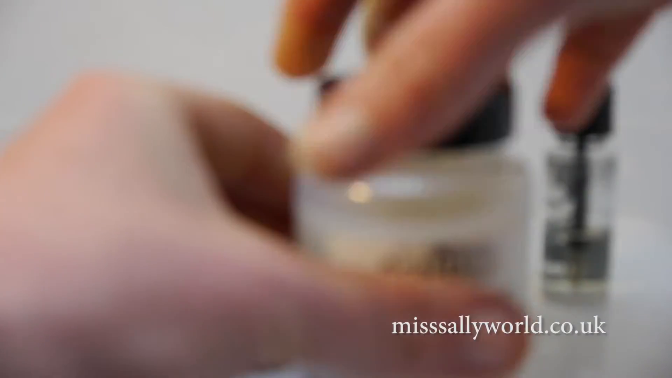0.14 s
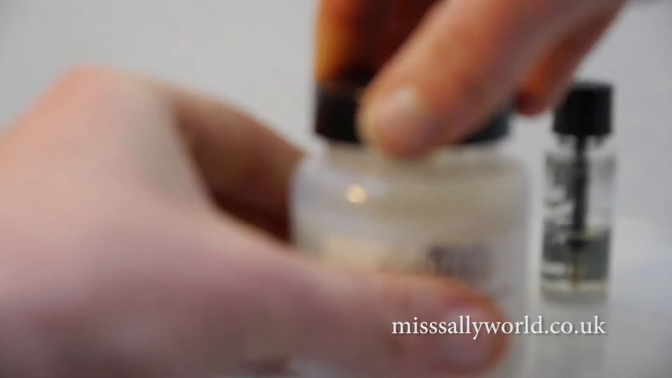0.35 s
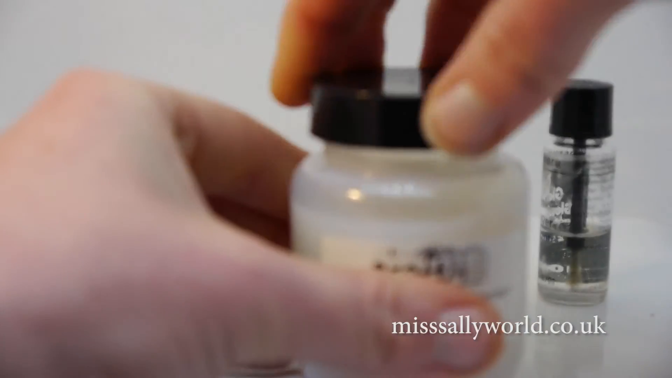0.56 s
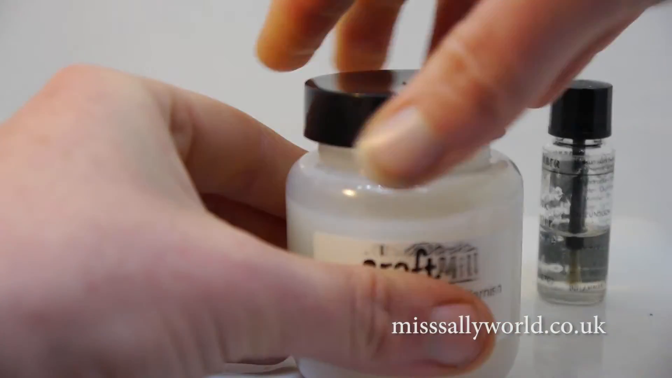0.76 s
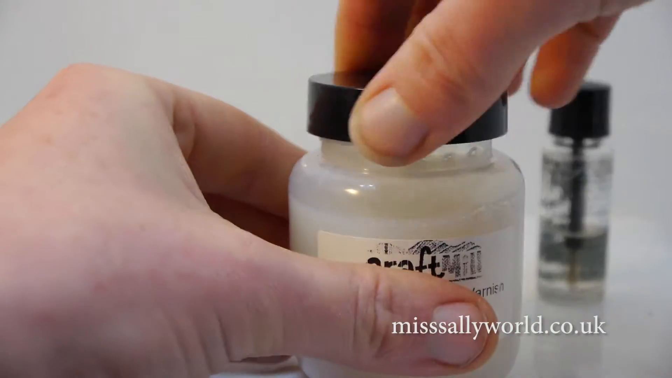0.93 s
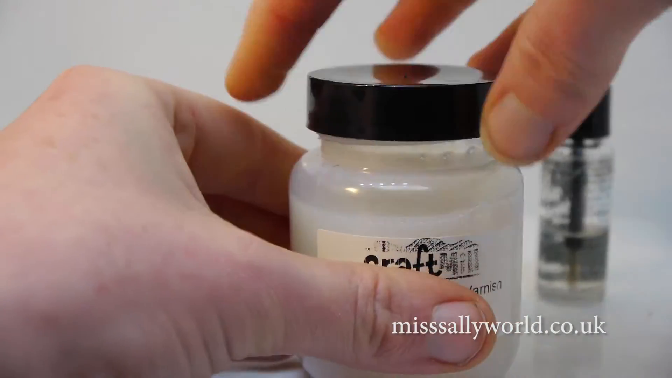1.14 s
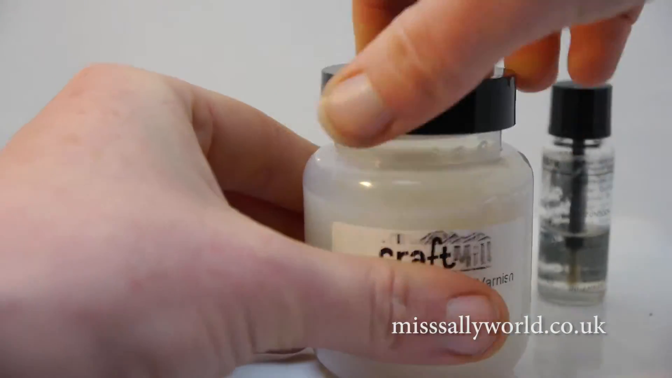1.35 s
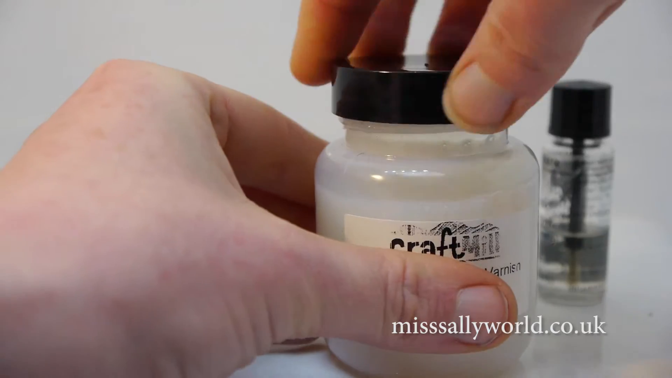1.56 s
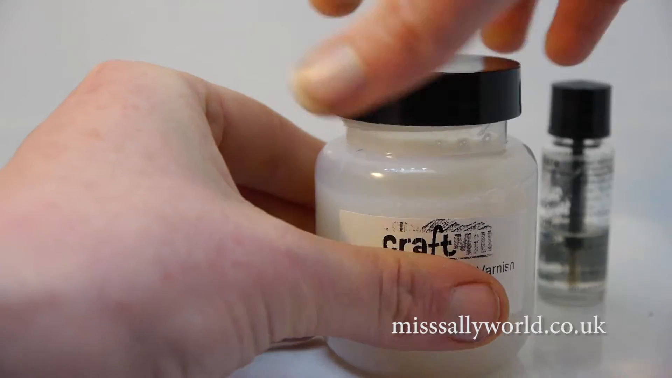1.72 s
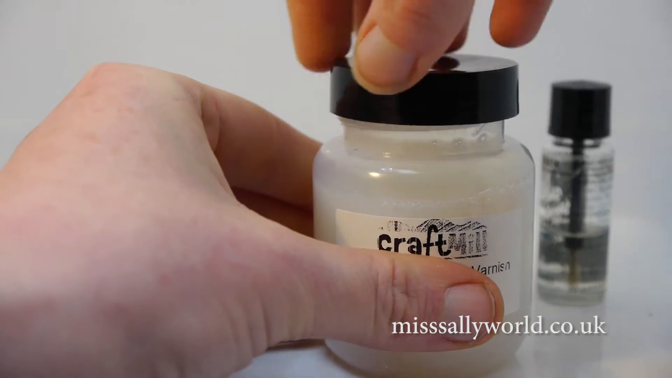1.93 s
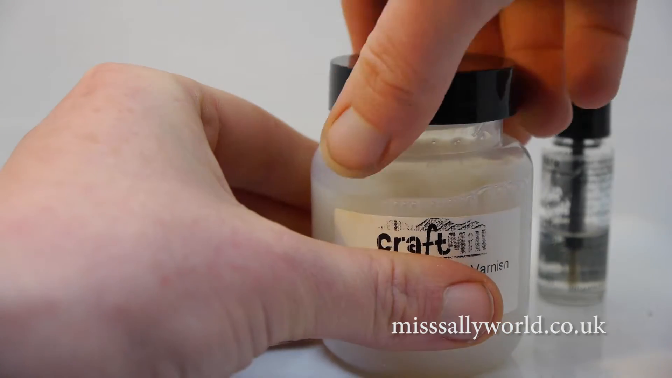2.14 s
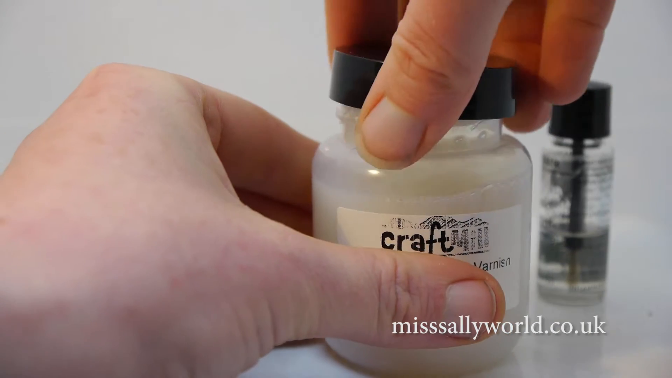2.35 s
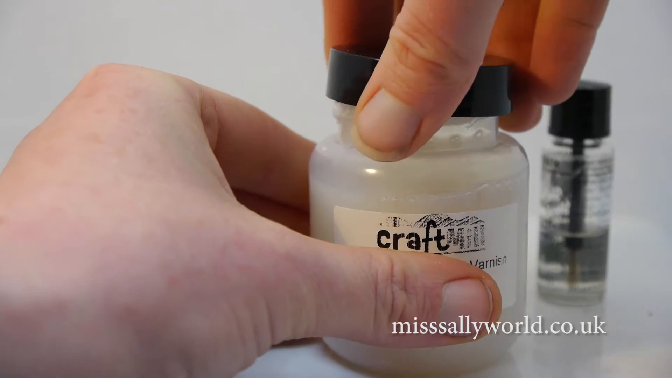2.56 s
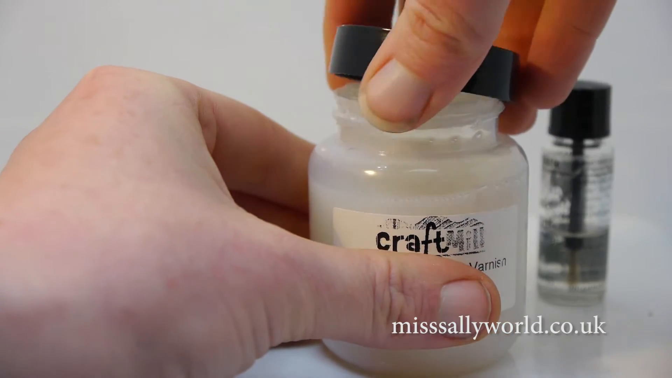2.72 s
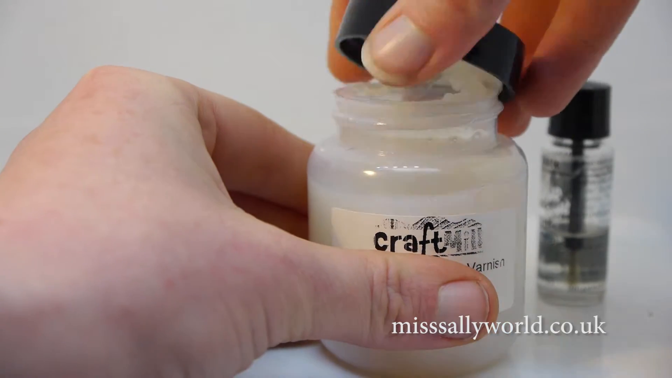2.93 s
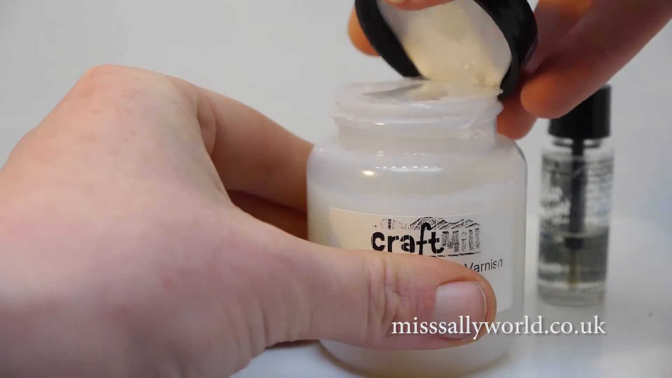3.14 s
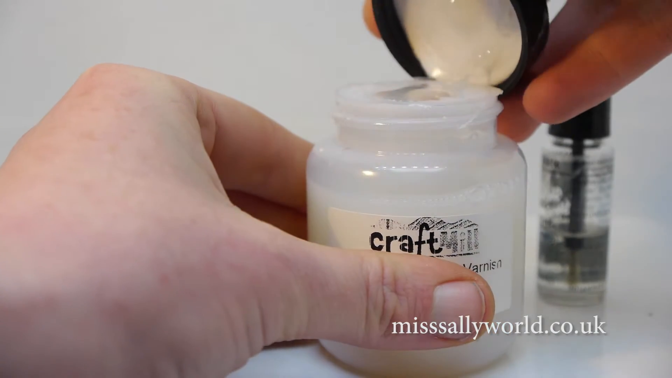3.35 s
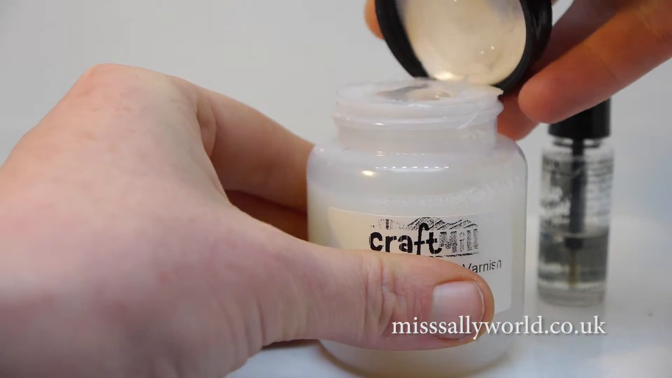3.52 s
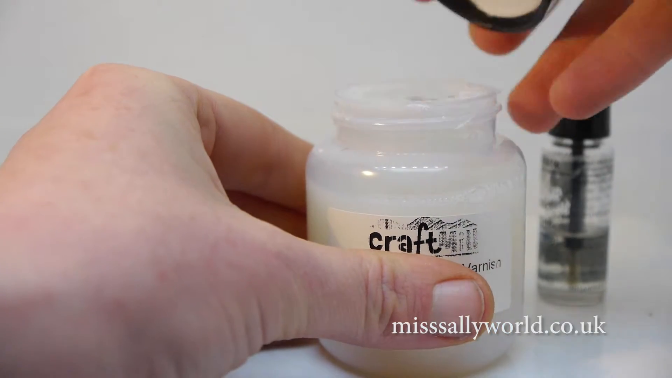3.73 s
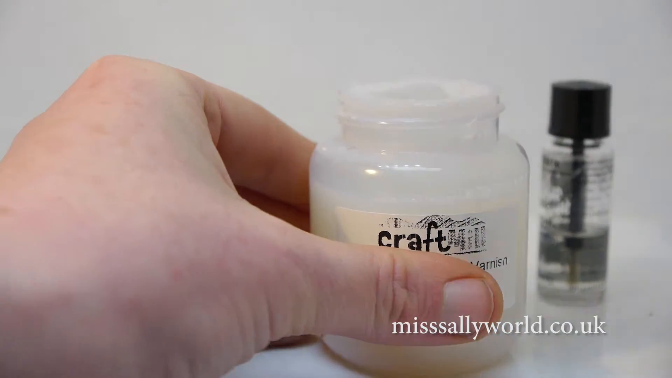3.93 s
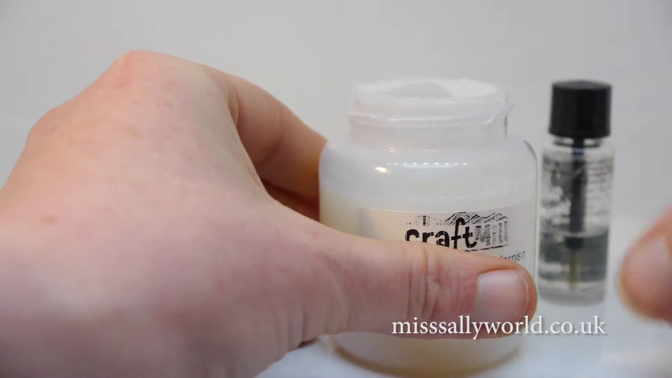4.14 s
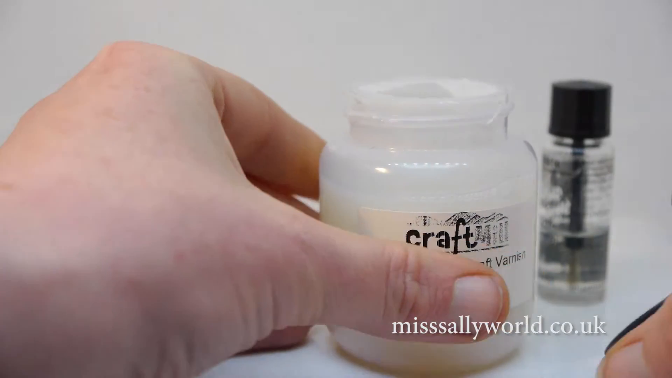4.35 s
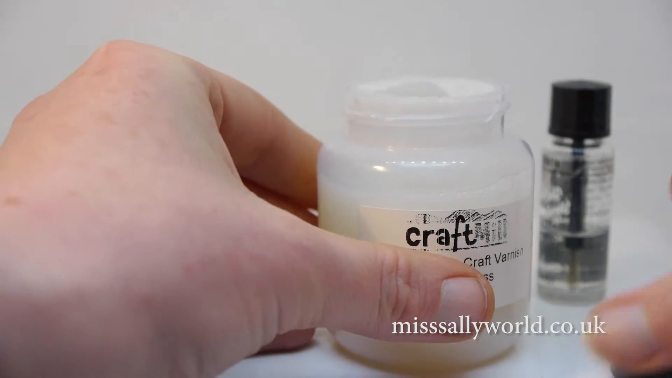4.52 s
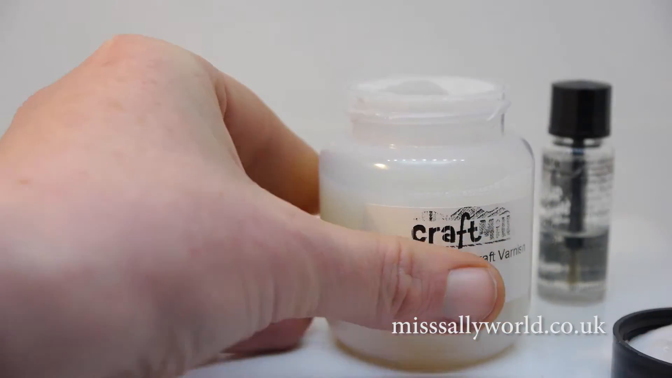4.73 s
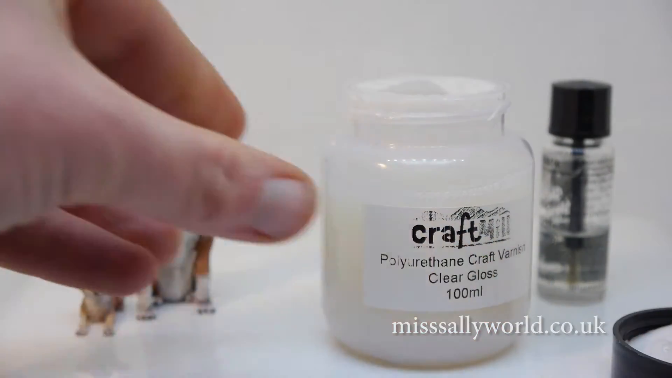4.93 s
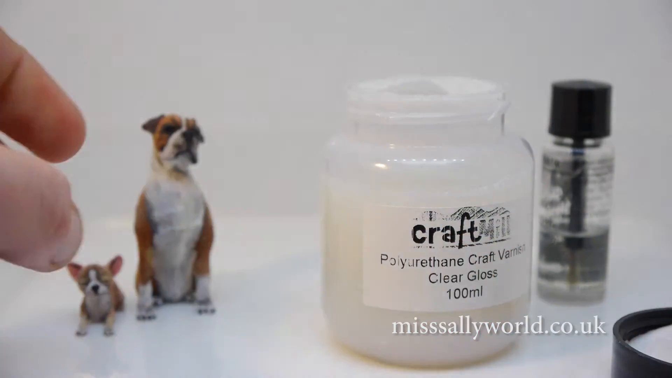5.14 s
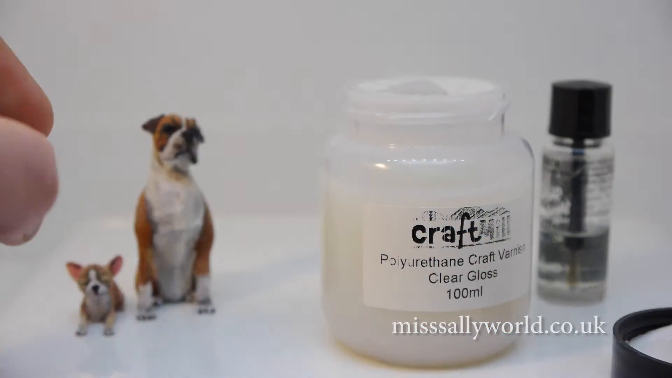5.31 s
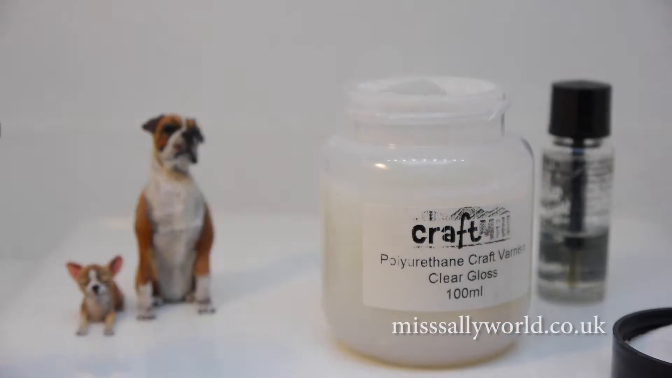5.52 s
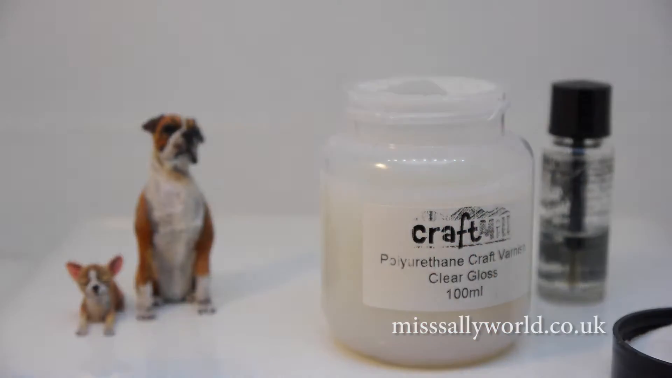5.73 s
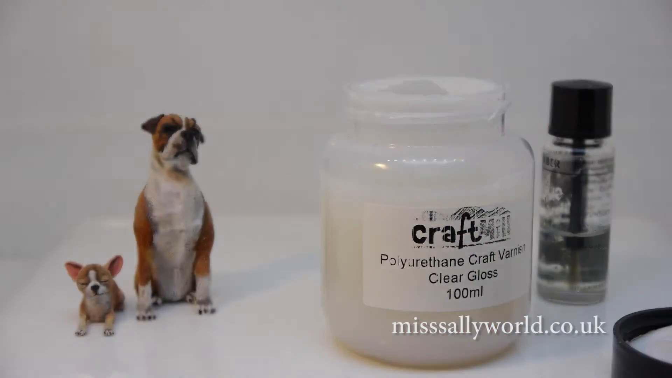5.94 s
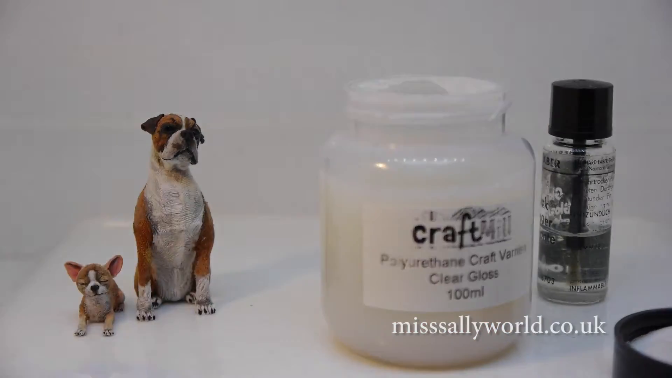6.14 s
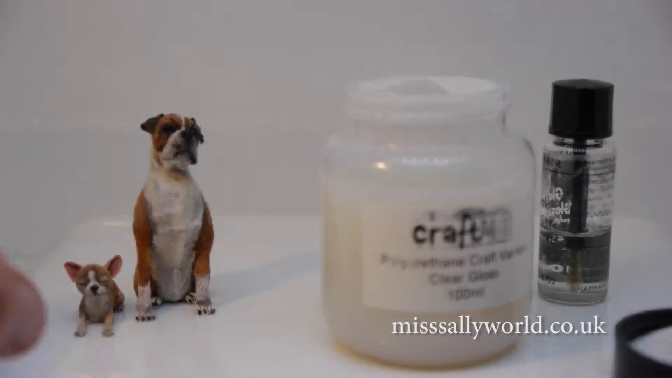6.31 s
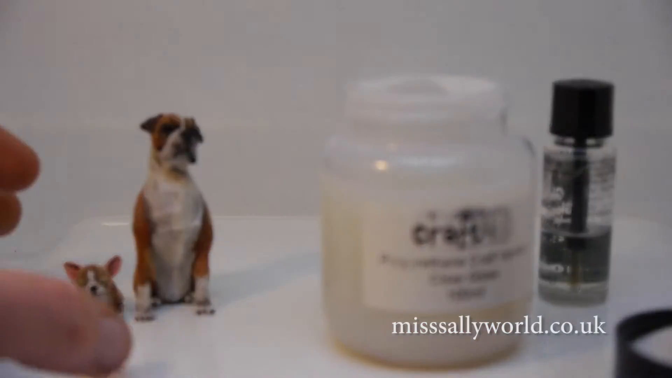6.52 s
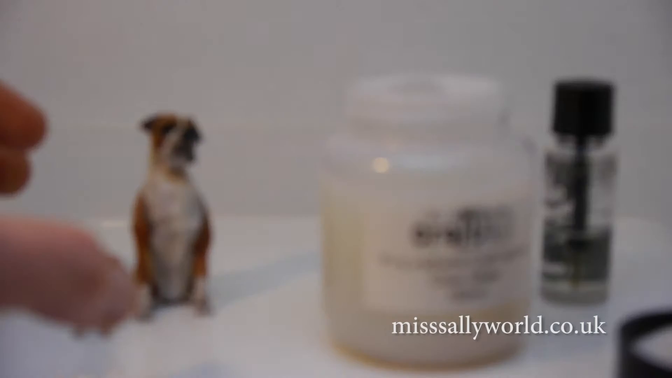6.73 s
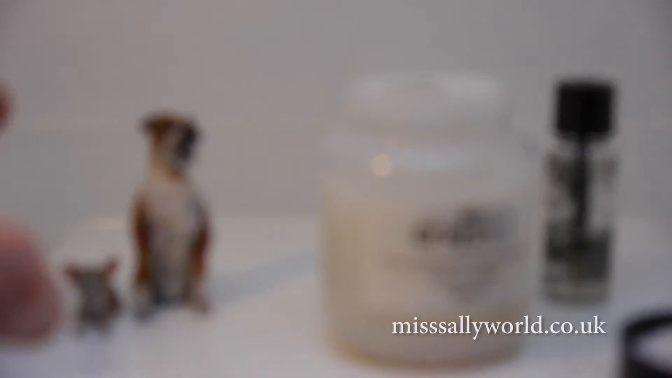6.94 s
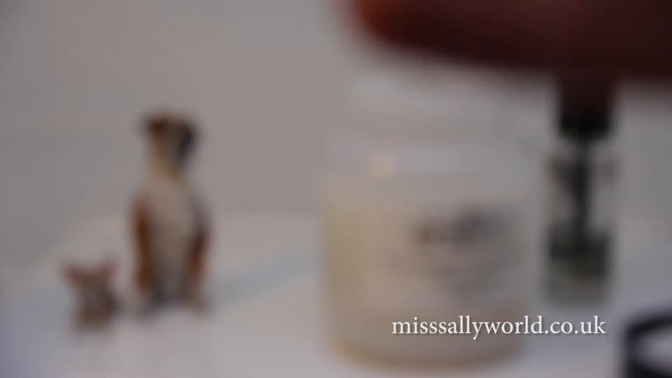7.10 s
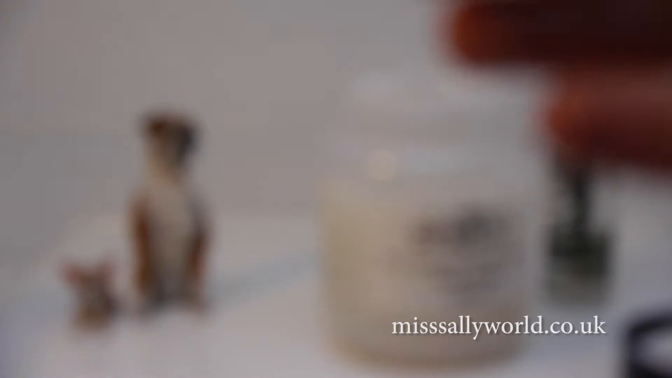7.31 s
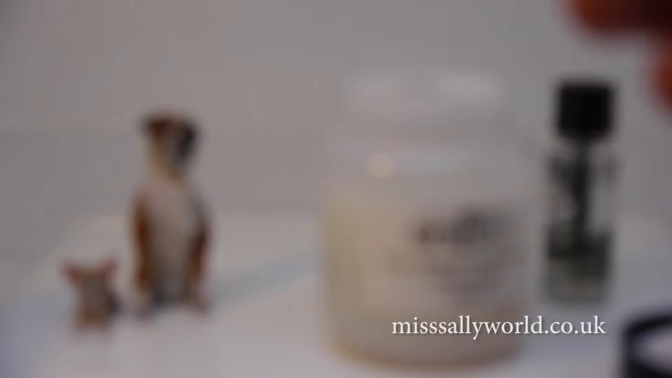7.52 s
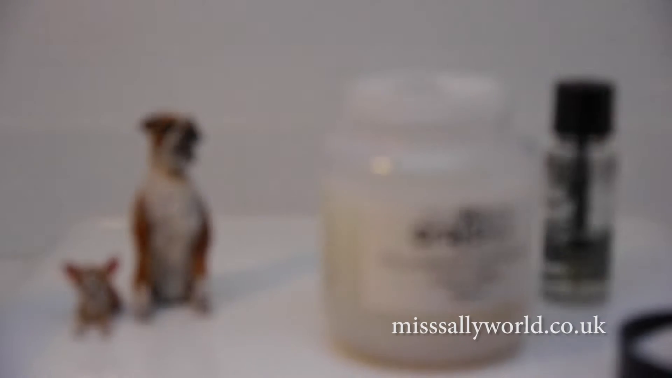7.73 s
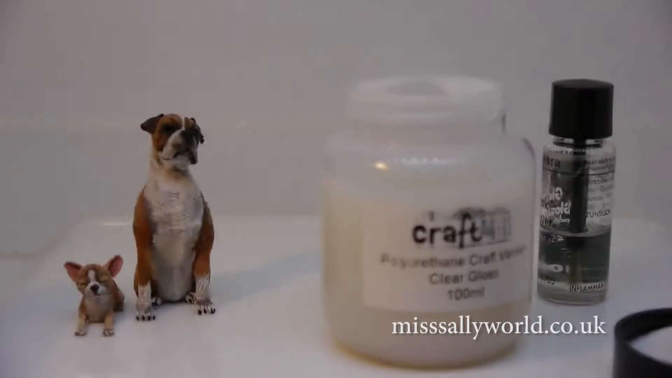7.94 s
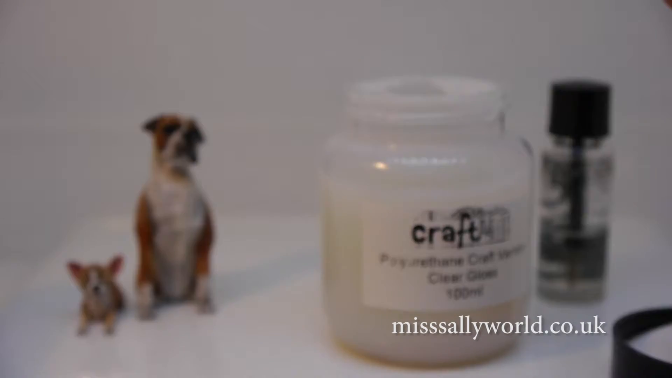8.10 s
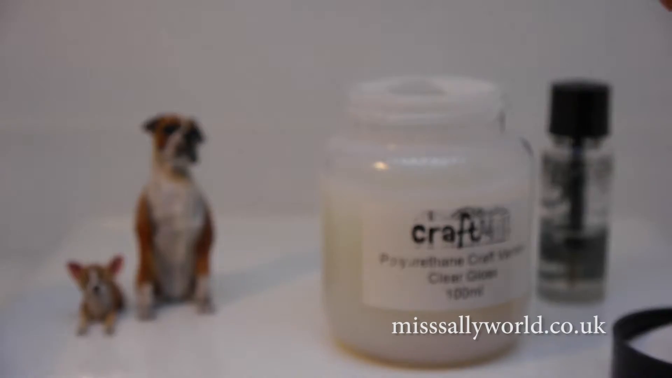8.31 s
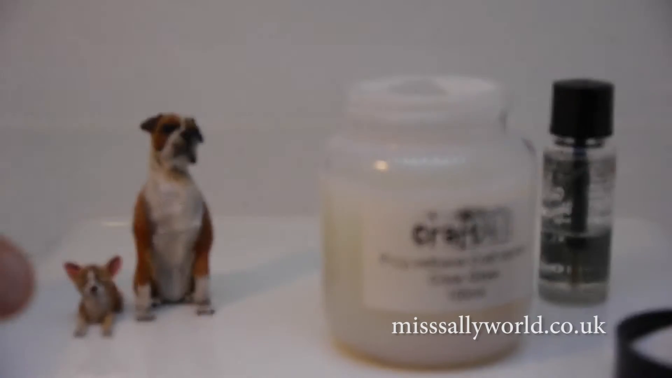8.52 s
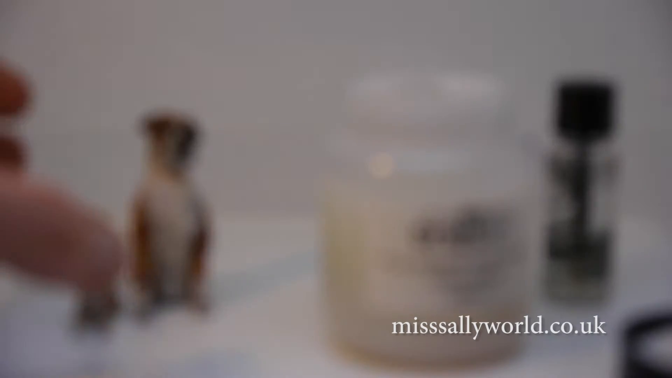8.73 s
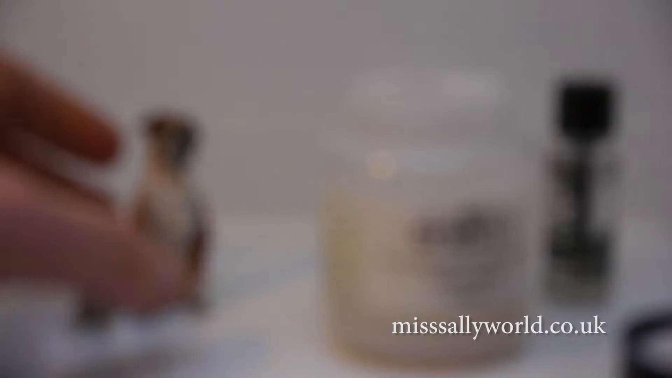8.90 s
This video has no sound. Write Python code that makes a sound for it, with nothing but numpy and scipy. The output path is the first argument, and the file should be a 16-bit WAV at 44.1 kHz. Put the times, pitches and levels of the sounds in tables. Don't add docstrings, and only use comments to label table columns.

```python
import sys
import numpy as np
from scipy import signal
from scipy.fft import rfft, irfft
from scipy.io import wavfile

SR = 44100
rng = np.random.default_rng(int(sys.argv[2]) if len(sys.argv) > 2 else 0)


def gain_from_db(level_db):
    decades = np.asarray(level_db, float) / 20
    return 10 ** decades


def output_pcm(signal):
    pcm = np.clip(np.atleast_2d(signal).T, -1, 1) * 32767
    wavfile.write(sys.argv[1], SR, np.round(pcm).astype(np.int16))


N = 395430

# start_s, level_db on the table, hardness_db of shell over table, contact_ms
TWIST_BLOWS = [(0.056, -27, -33, 5.5), (0.068, -22.5, -44, 20), (0.079, -20.5, -33, 11),
               (0.093, -28, -19, 26), (0.209, -31.5, -21, 22), (0.261, -31.5, -38, 37),
               (0.291, -28, -25, 24), (0.305, -34, -15, 9.9), (0.545, -35.5, 2.5, 15),
               (0.734, -30, -11, 9.8), (0.897, -20.5, -17, 5.8), (0.912, -32, -29, 16),
               (1.143, -19.5, -18.5, 6.8), (1.395, -23, -18, 23), (1.419, -34, -3, 15),
               (1.647, -26.5, -42, 6), (1.693, -16.5, -16, 10.5), (1.708, -29.5, -15, 22),
               (1.82, -25, -27, 9.5), (1.862, -31.5, -13, 49), (2.142, -25, -30, 18),
               (2.283, -34.5, -23, 12), (2.369, -25, -16, 2.6), (2.683, -16, -15, 6.6),
               (2.692, -23, -11, 2.6), (2.722, -38, -24, 3), (2.963, -35, 3, 30), (3.001, -30.5, -14, 24),
               (3.032, -35, -9, 12), (3.186, -33.5, -1, 31), (3.248, -28, -12, 6.9), (3.961, -28, -21, 7.6)]
LID_BLOWS = [(3.506, -57, 8, 11), (3.571, -37.5, 14, 9.7), (3.591, -28.5, 12.5, 4), (3.6, -34.5, 6, 33),
             (4.2, -35.5, -5, 8.6), (4.311, -9, -1, 10.8), (4.491, -20, -3, 4.6), (4.497, -19.5, 0, 5.8),
             (4.504, -14, 11, 4), (4.509, -18.5, 2, 13), (4.558, -15, 8, 6.9), (4.567, -21.5, -14, 20),
             (4.587, -20.5, 1, 5.9), (4.61, -25.5, -6, 9.5), (4.63, -29.5, -21, 18), (4.528, -27, -9, 22)]
FIGURE_BLOWS = [
    (5.208, -15, 3.5, 9.4),
    (5.222, -28, 0, 12),
    (5.242, -14.5, 1, 16),
    (5.258, -22, -11, 11.5),
]
SMALL_BLOWS = [
    (5.107, -18, -32, 7.6),
    (5.199, -23, -27, 5.3),
    (5.333, -22, -1, 7.1),
    (5.339, -11, -27.5, 5.5),
    (5.42, -20, -8, 12.4),
    (6.2, -39, 7, 6.3),
    (6.284, -39.5, -17, 14),
    (6.5, -47, -4, 6.8),
    (6.645, -43, 10, 10.6),
    (7.779, -47.5, -11, 14),
]

# pitch_hz, level_db, t60_s
TABLE_MODES = [(284.4, -1, 0.086), (344.8, -5.5, 0.1), (426.6, -4.5, 0.015), (516.4, -2.5, 0.057),
               (617, -5.5, 0.015), (195.2, -12, 0.2), (118, -23, 0.3)]
JAR_BODY = [(674, -2, 0.075), (900, 1, 0.022), (965, -3, 0.031), (1235, -2.5, 0.07), (1395, -1.5, 0.015),
            (1670, -7.5, 0.024), (2060, -12, 0.02), (2300, -25, 0.047)]
JAR_SHELL = [(2640, -6.5, 0.011), (3200, -13.5, 0.026), (4000, -19, 0.09), (4600, -9, 0.037),
             (5100, -13.5, 0.014), (5800, -36, .03)]
LID_BODY = [(684, -7, 0.05), (909, -0.5, 0.04), (1022, 0, 0.028), (1230, -3, 0.07), (1400, -1.5, 0.062),
            (1680, -9.5, .03), (2060, -12.5, 0.063)]
LID_SHELL = [(2330, 2, .04), (2410, 3.5, .04), (2552, 9, .046), (2650, -0.5, .05), (2950, 7.5, .04),
             (3260, -1, .04), (4000, 0, .04), (4550, 2, .04), (5060, -1.5, .04), (6300, -22, 0.011),
             (6310, -16, 0.023), (9080, -7.5, .03)]
FIGURE_BODY = [(980, -3, 0.033), (1150, -0.5, .07), (1300, 1.5, .07), (1504, -1.5, .06), (1710, -9, .03),
               (1970, -8.5, 0.072)]
FIGURE_SHELL = [(2450, -14, .03), (3200, -5, .04), (3400, 1.5, 0.033), (3800, 4, .04), (4200, -2, 0.027),
                (4800, -13, .04), (5260, 4, .05), (5650, -0.5, .04), (8300, -8.5, .04)]
SMALL_BODY = [(690, 1, 0.061), (907, -4, 0.053), (1144, -0.5, 0.023), (1403, -2, 0.058), (1713, -7, 0.061)]
SMALL_SHELL = [(2680, 0, .04), (3140, -2, .04), (3430, -5, 0.037), (4140, -4, .04), (4620, -5, .03)]

# level_db, one per table mode
JAR_PLACE = [0.34, 0.8, 1.1, 0, -6.5, 2, 4]
LID_PLACE = [-0.5, -1, -1.5, 3.5, 0, -1.5, -5.5]
FIGURE_PLACE = [2.7, 1, -2, -11, 0, -4, -14]
SMALL_PLACE = [5, -4.5, -5.5, -2, -6, 2, -1]

# start_s, peak_db, pitch_hz
THREAD_SNAPS = [(0.3401, -26, 13500), (0.4524, -29.5, 4900), (0.459, -24.5, 9050), (0.5302, -27, 4600),
                (0.5467, -25.5, 2010), (0.293, -49, 1200), (0.9816, -47, 4930), (1.0041, -44, 4570),
                (1.0929, -22, 8680), (1.1148, -26, 5070), (1.1413, -23, 5100), (1.2271, -27, 5160),
                (1.2929, -35, 3730), (1.3398, -41, 5110), (1.498, -35, 5920), (1.5509, -30, 5800),
                (1.6042, -31, 5410), (1.6242, -38, 5070), (1.6411, -28, 6150), (1.699, -27, 2390),
                (1.7549, -31, 5060), (1.2096, -29, 7030), (1.3129, -19, 11600), (1.4167, -16, 5060),
                (1.5299, -21.5, 10700), (1.6881, -21, 4910), (1.725, -23, 5090), (1.8921, -21.5, 8540),
                (2.1321, -24, 5550), (2.172, -26, 7300), (2.2967, -17, 5100), (2.3256, -17, 5100),
                (2.374, -18, 5600), (2.4663, -27, 3620), (2.6474, -30, 4060), (2.6918, -23.5, 4630),
                (0.049, -38, 4000), (1.81, -33, 7500), (1.861, -32, 4800)]
RIM_SNAPS = [(2.7586, -26, 4060), (2.7876, -21, 5100), (2.82, -23, 4000), (2.8474, -27, 5350),
             (2.9627, -11, 6760), (2.9996, -20, 4820), (2.777, -25, 5100), (2.966, -27, 1420),
             (3.033, -19, 2700), (3.1587, -23, 4560), (3.2515, -20, 5420), (3.3398, -24, 4540),
             (2.9015, -29, 5110), (2.9174, -30, 5150), (3.0586, -31, 5110), (3.1833, -24, 4000),
             (3.3046, -28, 2700), (3.3809, -24, 5220), (3.4278, -22, 5000), (3.443, -24, 11000),
             (3.572, -20, 2870), (3.465, -22, 3550), (3.5064, -16, 5140), (3.5917, -6, 2970),
             (3.9434, -21.5, 5440), (4.0587, -23, 4070)]
TABLE_SNAPS = [(4.2996, -33, 4000), (4.3111, -17, 3530), (4.4972, -32, 4760), (4.5037, -8, 3030),
               (4.5575, -12, 3120), (4.7885, -29, 4600), (5.2076, -18, 3400), (5.2425, -16, 3400),
               (5.3363, -21, 3040), (5.3772, -20, 9150), (5.4201, -24.5, 3000), (5.4969, -26, 4500),
               (6.44, -37, 2200), (6.515, -44, 8000), (6.538, -40, 8500), (5.107, -27, 2960),
               (4.86, -38, 5000), (4.896, -38, 6500), (4.93, -34, 4500), (6.4961, -21, 9920),
               (6.565, -30, 3620), (6.5959, -33, 6000), (6.6455, -26.5, 3200), (6.647, -14.5, 8300),
               (6.2, -22.5, 830), (5.092, -26, 6720), (7.5462, -32, 7700), (7.9039, -31, 9020),
               (8.1708, -44, 3760), (4.504, -16, 10020), (4.558, -20, 10000), (8.39, -46, 3200)]

# start_s, length_s, level_db, swell_db, brightness_db
GRIPS = [(0.0, 0.12, -55, -5, 1), (.31, 0.075, -50.5, 13, 2), (.445, 0.02, -53, -4, 6),
         (.5, 0.082, -54, 4, -6), (.58, 0.12, -57.5, -4, -6), (.72, 0.021, -51, 15, -3),
         (.8, 0.12, -55.5, 19, 16), (.97, 0.16, -49, 0, 2.5), (1.09, 0.082, -47, 7, 5),
         (1.2, 0.16, -47.5, 0, 7), (1.29, 0.15, -42.5, 13.5, 5.5), (1.47, 0.17, -44.5, 4, 6),
         (1.67, 0.045, -46.5, 13, 8), (1.78, 0.23, -55.5, -1, -3), (1.95, 0.21, -56.5, 11, -5),
         (2.12, 0.083, -44.5, -4, 2), (2.2, 0.083, -56.5, -6, -7), (2.28, 0.14, -45, -2, 9.5),
         (2.4, 0.19, -61.5, 11, 10), (2.75, 0.12, -45, 9, 7), (2.9, 0.057, -50, 4, 7),
         (2.96, 0.083, -44.5, 4, 3), (3.06, 0.12, -41, -1, 6.5), (3.19, 0.097, -47.5, -3, 7),
         (3.27, .04, -49, -2, 14), (3.31, 0.11, -39, 0, 6), (3.42, 0.088, -45, 8, 9),
         (3.5, 0.16, -49, 2, 1), (3.64, 0.29, -57.5, 11, 9.5), (3.93, 0.17, -56.5, 4, -10.5),
         (4.1, 0.24, -54.5, 4, -3), (.9, 1.67, -59, -8, -7)]
SWISHES = [(4.26, 0.081, -43.5, -5, 7), (4.34, 0.11, -58.5, -5, -10), (4.47, 0.025, -49, 2, -16.5),
           (4.52, 0.12, -37.5, -9, -5), (4.69, 0.13, -48, -13, 4.5), (4.82, 0.27, -48.5, -12, 3.5),
           (5.05, 0.13, -50, 4, 10), (5.25, 0.33, -51.5, -9, 1), (5.5, 0.26, -61.5, -7, -6),
           (5.75, 0.75, -57.5, -8, 5), (4.2, 0.029, -46.5, 0, 5), (6.06, 0.07, -52, -8, 12),
           (6.16, 0.064, -36.5, 7, 6), (6.28, 0.14, -59, 5, -1), (6.38, 0.22, -47.5, 7.5, -4),
           (6.65, 0.024, -45.5, -11, -1), (6.77, 0.26, -51, -7.5, 1.5), (6.96, 0.13, -70.5, -2, 5)]
# start_s, length_s, level_db, swell_db, pitch_hz
SQUEAKS = [
    (6.285, .075, -54, -3, 1500),
    (6.26, .1, -65, 0, 4300),
    (6.45, .04, -56, 1, 1800),
    (6.8, .06, -56, -3, 2700),
    (6.78, .1, -58, -1, 2250),
    (4.197, .015, -55, 1, 1780),
    (7.76, .04, -57, 1, 800),
]
# start_s, length_s, level_db, swell_db
FOCUS = [
    (0.0, 0.82, -68, 4),
    (7.22, 0.75, -64.5, -4.5),
    (8.0, 0.47, -68, 5.5),
]
# start_s, length_s, level_db, swell_db
LEANS = [(.07, 0.13, -42, -5), (.35, 0.088, -42, 5), (.7, 0.077, -42, 15), (.9, 0.1, -43, 11),
         (1.64, 0.38, -44, -12), (2.1, 0.11, -43.5, 15), (2.66, 0.067, -44, 15), (2.95, 0.096, -49, 4),
         (3.56, 0.079, -39.5, 19), (5.16, 0.25, -45.5, 3), (8.52, 0.2, -54, 2.5)]

# pitch_hz, level_db per Hz
SKIN = [(1470, -27), (2500, -10.5), (3950, -3.5), (4310, -4.5), (5070, -2.5), (6550, -6), (10800, -4),
        (13200, -2.5), (16000, -8)]
DULL_RUSTLE = [(350, -8.5), (600, -4.5), (798, -9.5), (928, -8), (1900, -11), (2040, -11.5), (4000, -18.5),
               (5200, -35), (8800, -120)]
SLEEVE = [(530, -13), (900, 4), (1150, -0.5), (1600, 1), (1820, 2), (2510, -0.5), (2750, 0.5), (13800, -21),
          (15000, -12)]
ROOM_HISS = [(88, -62), (150, -4), (172, -9), (275, -14), (406, -15), (566, -14.5), (1290, -20),
             (1480, -19), (2180, -28), (3550, -28), (4320, -29.5), (7770, -33.5), (16000, -33.5)]
RUMBLE = [(12, -48), (20, -23), (43, -15.5), (54, -6), (65, -33), (82, -5.5), (103, 1), (119, 1.5),
          (135, -9.5), (220, -7), (290, -8), (480, -120)]
# pitch_hz, level_db
FOCUS_WHIRR = [(1550, -4), (1960, 2), (2680, -3.5), (3500, -4.5), (4600, -4)]
# pitch_hz, level_db
WHINE = [(7574, -83.5)]
# pitch_hz, likeness (1 = the same)
LIKENESS = [(25, 0.92), (60, .998), (180, 1), (550, 0.93), (1650, 0.38), (4970, 0.034), (15000, 0.042)]

LID_OFF_S = 4.2
BODY_FOLLOWS = 0.3
BODY_CUT_HZ, CUT_FOLLOWS = 2900, 0.31
SNAP_RISE_S = 0.00091
SNAP_RING, SNAP_WIDTH = 1.8, 0.065
GRIP_EDGE, SWISH_EDGE, SHORTEST_EDGE_S = 0.33, 0.54, 0.037
RELEASE_SLOWER = 1.64
STILL_DB = -71.5
RUSTLE_DB, RUSTLE_FOLLOWS = -46, 0.95
CLOTH_HISS_DB = -8.5
MURMUR_DB, MURMUR_FOLLOWS, MURMUR_LATE_DB = -49, 0.43, -2
CRACKLE_PER_S, CRACKLE_DB = 70, -12
SQUEAK_WIDTH_HZ = 170
RUMBLE_DB, RUMBLE_LATE_DB, ROOM_HISS_DB = -48.5, -2.5, -52.5
ROOM_LAG = 4
ROOM_T60_S, ROOM_DB = 0.093, -10
MIC_TOP_HZ, TOP_CUT_HZ = 12600, 16050


def blows(rows, place_db, body_modes, shell_modes, crack_t60, body_db, crack_db):
    out = np.zeros((2, N))
    for s, table_db, hard_db, contact_ms in rows:
        contact_s = np.clip(contact_ms, 1, 50) / 1000
        body = struck(body_modes, rough=1.0, contact_s=0.417 * contact_s, longest_t60=0.05, tail=0.11)
        body_top_hz = min(BODY_CUT_HZ * gain_from_db(CUT_FOLLOWS * hard_db), 9000)
        body = signal.lfilter(*signal.butter(1, body_top_hz, fs=SR), body)
        shell = struck(shell_modes, rough=1.1, contact_s=0.2 * contact_s, longest_t60=0.022, tail=0.25)
        thud = pushed(contact_s, place_db) + gain_from_db(body_db + BODY_FOLLOWS * hard_db) * body
        add(out, gain_from_db(table_db) * thud, s, 0)
        add(out, gain_from_db(table_db + hard_db + 3.5) * shell, s, -1.5)
        add(out, gain_from_db(table_db + 1.7 * hard_db + crack_db) * crack(7000, 13000, crack_t60), s, -1.2)
    return out


def pushed(contact_s, place_db):
    t = np.arange(round(0.15 * SR)) / SR
    hz, level_db, t60 = np.transpose(TABLE_MODES)[:, :, None]
    chance = rng.standard_normal((2, len(TABLE_MODES), 1))
    level_db = level_db + np.array(place_db)[:, None] + 2.0 * chance[0]
    phase = 2 * np.pi * hz * (1 + 0.012 * chance[1]) * t + 0.5 * chance[1]
    decay = gain_from_db(-60 * np.maximum(t - contact_s, 0) / np.minimum(t60, 0.12))
    rings = gain_from_db(level_db) * np.sin(phase) * decay
    wave = rings.sum(0) * (1 - np.exp(-t / (0.0049 + 0.037 * contact_s)))
    return wave / np.abs(wave).max()


def struck(modes, rough, contact_s, longest_t60, tail):
    t = np.arange(round(0.15 * SR)) / SR
    hz, level_db, t60 = np.transpose(modes)[:, :, None]
    chance = rng.standard_normal((2, len(modes), 1))
    level = gain_from_db(level_db + 1.1 * chance[0])
    t60 = np.minimum(t60, longest_t60)
    rings = level * gain_from_db(-60 * t / t60) * np.sin(2 * np.pi * hz * (1 + 0.011 * chance[1]) * t)
    noise = rng.standard_normal((2, len(t)))
    noise[1] = 0.75 * noise[0] + 1.65 * noise[1] * min(hz.mean() / 2500, 1)
    crowd = sum((-1) ** k * level[k] * resonate(noise, f, 0.11 * f) for k, f in enumerate(hz[:, 0]))
    held = tail * gain_from_db(-60 * np.maximum(t - contact_s, 0) / (2.8 * longest_t60))
    held = held + 1.5 * gain_from_db(-60 * t / (0.8 * longest_t60))
    wave = (rings.sum(0) + rough * rms_one(crowd) * held) * (1 - np.exp(-t / 0.0004))
    return wave / np.abs(wave).max()


def crack(low_hz, high_hz, t60):
    t = np.arange(round(0.06 * SR)) / SR
    band = signal.butter(2, [low_hz, min(high_hz, 0.4 * SR)], "band", fs=SR, output="sos")
    tick = 0.52 * gain_from_db(-60 * t / 0.015)
    swell = (tick + gain_from_db(-60 * t / t60)) * (1 - np.exp(-t / SNAP_RISE_S))
    push = rng.standard_normal((2, len(t))) * swell
    push[:, 8] += 7.0
    wave = signal.sosfilt(band, push)
    wave[1] = 0.3 * wave[0] + 0.95 * wave[1]
    return wave / np.abs(wave).max()


def snaps(rows, pan_db, below, above):
    out = np.zeros((2, N))
    for s, peak_db, hz in rows:
        click = crack(below * hz, above * hz, t60=0.071)
        ring = SNAP_RING * resonate(click, hz, SNAP_WIDTH * hz)
        add(out, gain_from_db(peak_db - 1.5) * (click + ring), s, pan_db)
    return out


def rubbing():
    on_lid = np.arange(N) / SR < LID_OFF_S
    grip_db = strokes(GRIPS, GRIP_EDGE, lean=-0.38)
    swish_db = strokes(SWISHES, SWISH_EDGE, lean=-0.62)
    grip_top_db = strokes(GRIPS, GRIP_EDGE, lean=0.53)
    swish_top_db = strokes(SWISHES, SWISH_EDGE, lean=0.46)
    skin_db = np.where(on_lid, grip_db, swish_db + CLOTH_HISS_DB)
    top_db = np.where(on_lid, grip_top_db, swish_top_db + CLOTH_HISS_DB)
    dull_db = np.where(on_lid, RUSTLE_DB + RUSTLE_FOLLOWS * (grip_db + 48.5), swish_db)
    murmur_db = MURMUR_DB + MURMUR_FOLLOWS * (dull_db + 47.0) + MURMUR_LATE_DB * ~on_lid

    slips = grains(1500, spread_db=3.6)
    waking = sum(gain_from_db(db + 4 * drift(20)) * resonate(slips, hz, 0.07 * hz) for hz, db, t60 in JAR_SHELL)
    skin = patchy(shaped(slips + 1.4 * waking, SKIN), depth_db=4.2) + gain_from_db(CRACKLE_DB) * crackle()
    cloth = signal.lfilter([1], [1, -0.45], rng.standard_normal((2, N)))
    bright = np.where(on_lid, skin, patchy(shaped(cloth, SKIN), depth_db=3.5))
    rustle = shaped(grains(800, spread_db=0.0), DULL_RUSTLE)
    dull = np.where(on_lid, rustle, shaped(rng.standard_normal((2, N)), SLEEVE))

    jolts = grains(400, spread_db=2.2)[0]
    knock = pushed(0.00036, JAR_PLACE) * gain_from_db(-np.arange(round(0.15 * SR)) / 20.0)
    murmur = rms_one(signal.fftconvolve(jolts, knock)[:N])

    low = signal.sosfilt(signal.butter(2, 6200, fs=SR, output="sos"), bright)
    top = signal.sosfilt(signal.butter(2, 6200, "high", fs=SR, output="sos"), bright)
    bright = gain_from_db(2.0 + drift(45)) * (gain_from_db(skin_db) * low - gain_from_db(top_db) * top) * gain_from_db([[-0.7], [0.7]])
    dull = gain_from_db(dull_db + 2.6 * drift(21) * on_lid) * dull
    return bright + dull + gain_from_db(murmur_db + 1.8 * drift(6.0)) * murmur


def grains(per_s, spread_db):
    sizes = gain_from_db(spread_db * np.minimum(rng.exponential(1, (2, N)), 3)) * rng.standard_normal((2, N))
    born = rng.random(N) < per_s * gain_from_db(5 * drift(35)) / SR
    return rms_one(rms_one(sizes * born) + 1.2 * rng.standard_normal((2, N)))


def crackle():
    born = rng.random(N) < CRACKLE_PER_S / SR
    ticks = born * gain_from_db(2.3 * np.minimum(rng.exponential(1, N), 3))
    puffs = signal.lfilter([1], [1, -gain_from_db(-60 / (0.026 * SR))], ticks)
    return rms_one(puffs * shaped(rng.standard_normal((2, N)), SKIN))


def patchy(x, depth_db):
    edges = [500, 1500, 2500, 3500, 4600, 5800, 7500, 9500, 12000, 16500]
    bands = [signal.butter(1, pair, "band", fs=SR, output="sos") for pair in zip(edges, edges[1:])]
    return rms_one(sum(gain_from_db(depth_db * drift(32)) * signal.sosfilt(band, x) for band in bands))


def strokes(rows, edge, lean=0):
    t = np.arange(0, N, 16) / SR
    power = gain_from_db(2 * STILL_DB)
    for s, length, db, swell_db, *bright_db in rows:
        fade = max(edge * length, SHORTEST_EDGE_S)
        along = np.clip((t - s) / length, 0, 1)
        fade_in = np.clip((t - s) / fade + 0.5, 0, 1)
        fade_out = np.clip((s + length - t) / (RELEASE_SLOWER * fade) + 0.5, 0, 1)
        level = gain_from_db(db + swell_db * (along - 0.5) + lean * sum(bright_db))
        power = power + (fade_in * fade_out * level) ** 2
    return np.interp(np.arange(N) / SR, t, 10 * np.log10(power))


def squeaks():
    hiss = rng.standard_normal(N)
    out = 0
    for row in SQUEAKS:
        hz = row[-1]
        chirr = resonate(resonate(hiss, hz, SQUEAK_WIDTH_HZ), hz, SQUEAK_WIDTH_HZ)
        out = out + (gain_from_db(strokes([row], edge=0.2)) - gain_from_db(STILL_DB)) * rms_one(chirr)
    return out


def room(x):
    t = np.arange(round(0.4 * SR)) / SR
    tail = rng.standard_normal((2, len(t))) * gain_from_db(-60 * t / ROOM_T60_S) * (t > 0.004)
    tail = signal.lfilter([1], [1, -0.4], tail)
    tail = tail / np.sqrt(np.sum(tail ** 2, axis=1, keepdims=True))
    thin = signal.sosfilt(signal.butter(4, 650, "high", fs=SR, output="sos"), x.mean(0))
    return signal.fftconvolve(thin[None], tail, axes=1)[:, :N]


def focus():
    hiss = rng.standard_normal((2, N))
    whirr = sum(gain_from_db(db + 2.1 * drift(4.1)) * rms_one(resonate(hiss, hz, 190)) for hz, db in FOCUS_WHIRR)
    return (gain_from_db(strokes(FOCUS, edge=0.063)) - gain_from_db(STILL_DB)) * whirr


def room_tone():
    steady_db = RUMBLE_DB + RUMBLE_LATE_DB * (np.arange(N) / SR > LID_OFF_S)
    rumble_db = 10 * np.log10(gain_from_db(2 * steady_db) + gain_from_db(2 * strokes(LEANS, edge=0.085)))
    (hz, whine_db), = WHINE
    whine = gain_from_db(whine_db + 3.5) * np.sin(2 * np.pi * hz * np.arange(N) / SR)
    rumble = gain_from_db(rumble_db + 0.5) * shaped(rng.standard_normal((2, N)), RUMBLE)
    hiss = gain_from_db(ROOM_HISS_DB + 1.0 * drift(4.0)) * shaped(rng.standard_normal((2, N)), ROOM_HISS)
    air = (rumble + hiss) * gain_from_db([[0.25], [-0.25]])
    return np.array([air[0], np.roll(air[1], ROOM_LAG)]) + whine


def resonate(x, hz, width_hz):
    r = np.exp(-np.pi * width_hz / SR)
    poles = [1, -2 * r * np.cos(2 * np.pi * hz / SR), r * r]
    return signal.lfilter([(1 - r * r) / 2, 0, (r * r - 1) / 2], poles, x)


def shaped(source, spectrum):
    hz = np.maximum(np.fft.rfftfreq(N, 1 / SR), 1)
    alike = np.clip(at_hz(LIKENESS, hz), -1, 1)
    mid, side = rfft(source) * gain_from_db(at_hz(spectrum, hz))
    ports = np.sqrt(1 + alike) * mid + np.sqrt(1 - alike) * side * [[1], [-1]]
    return rms_one(irfft(ports, N))


def at_hz(points, hz):
    point_hz, value = np.array(points).T
    return np.interp(np.log(hz), np.log(point_hz), value)


def drift(rate):
    r = np.exp(-80 * np.pi * rate / SR)
    slow = signal.lfilter([1], [1, -2 * r, r * r], rng.standard_normal(N // 40 + 2002))[2000:]
    return np.interp(np.arange(N) / 40, np.arange(len(slow)), rms_one(slow))


def rms_one(x):
    return x / np.sqrt(np.mean(x ** 2) + 1e-20)


def add(out, wave, s, pan_db):
    i = round(s * SR)
    wave = wave * gain_from_db(np.array([[pan_db], [-pan_db]]) / 2)
    out[:, i:i + wave.shape[1]] += wave[:, :N - i]


def scene():
    hits = blows(TWIST_BLOWS, JAR_PLACE, JAR_BODY, JAR_SHELL, crack_t60=0.016, body_db=2.3, crack_db=-11.0)
    hits += blows(LID_BLOWS, LID_PLACE, LID_BODY, LID_SHELL, crack_t60=0.049, body_db=2.5, crack_db=-5.5)
    hits += blows(FIGURE_BLOWS, FIGURE_PLACE, FIGURE_BODY, FIGURE_SHELL,
                  crack_t60=0.057, body_db=-1.0, crack_db=-3.5)
    hits += blows(SMALL_BLOWS, SMALL_PLACE, SMALL_BODY, SMALL_SHELL,
                  crack_t60=0.03, body_db=5.5, crack_db=-17)
    hits += snaps(THREAD_SNAPS, -1.6, below=0.45, above=2.45)
    hits += snaps(RIM_SNAPS, -2.1, below=0.5, above=2.53)
    hits += snaps(TABLE_SNAPS, -1.6, below=0.47, above=2.53)
    hits = signal.sosfilt(signal.butter(4, 110, "high", fs=SR, output="sos"), hits)
    return hits + gain_from_db(ROOM_DB) * room(hits) + rubbing() + squeaks() + room_tone() + focus()


def top_cut(x):
    return signal.sosfilt(signal.butter(12, 16460, fs=SR, output="sos"), x)


def record(dry):
    soft = signal.sosfilt(signal.butter(1, MIC_TOP_HZ, fs=SR, output="sos"), dry)
    clipped = np.clip(soft, -0.9, 0.9)
    mix = signal.sosfilt(signal.cheby2(20, 60, TOP_CUT_HZ, fs=SR, output="sos"), clipped)
    return top_cut(mix)


dry = scene()
out = record(dry)
output_pcm(out)
```